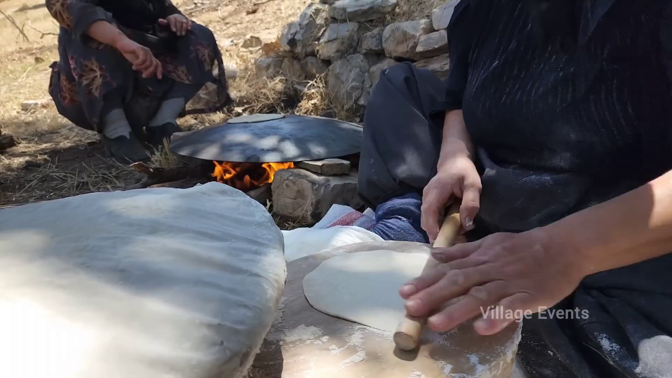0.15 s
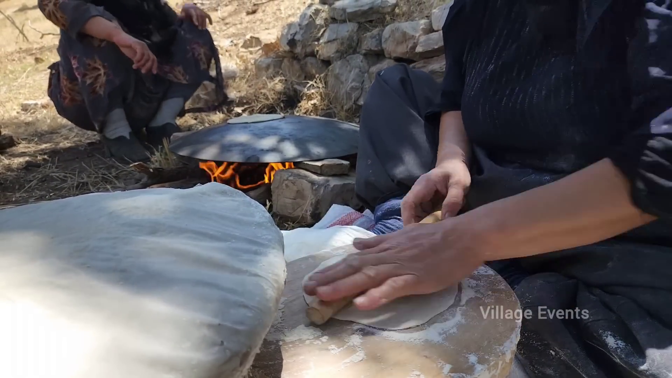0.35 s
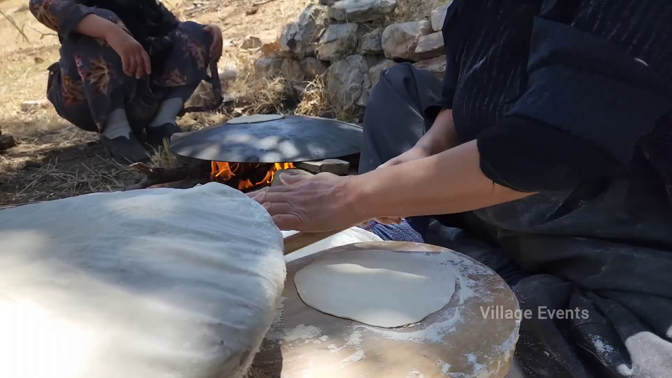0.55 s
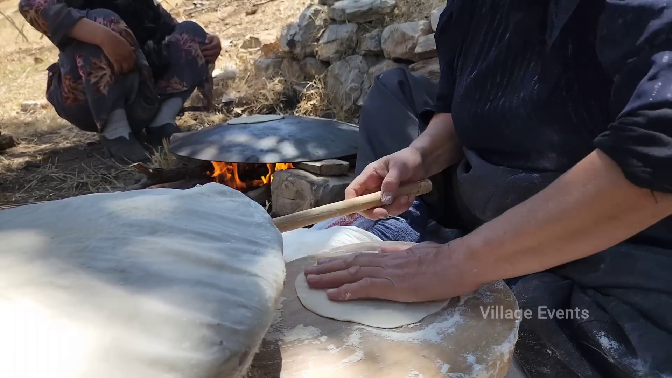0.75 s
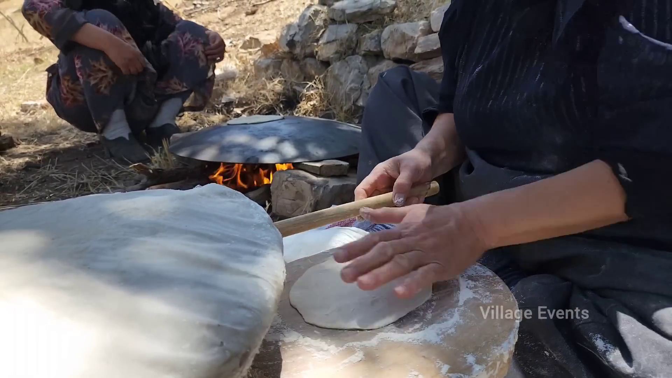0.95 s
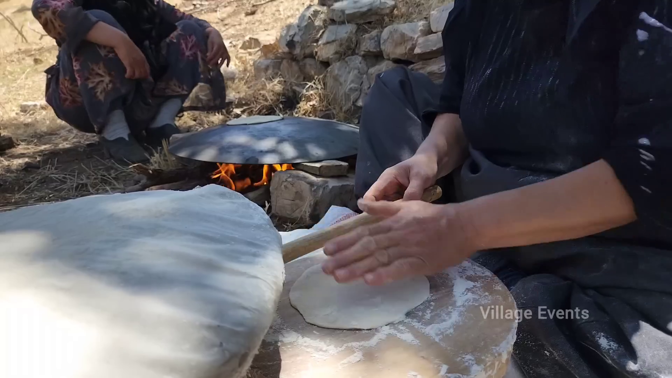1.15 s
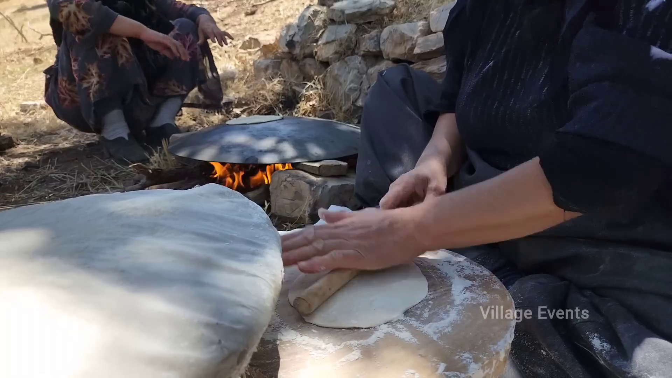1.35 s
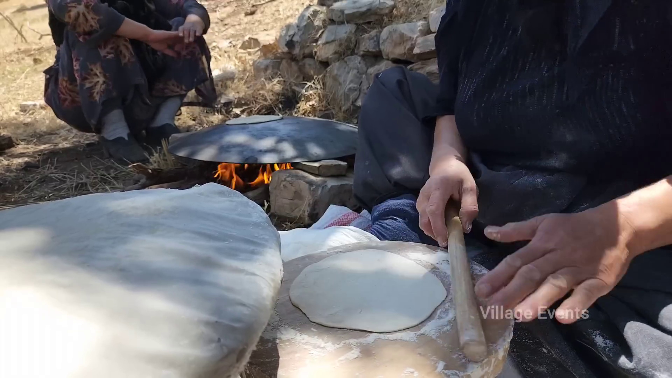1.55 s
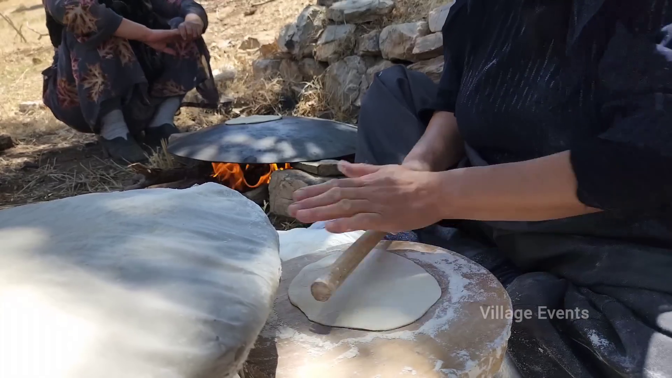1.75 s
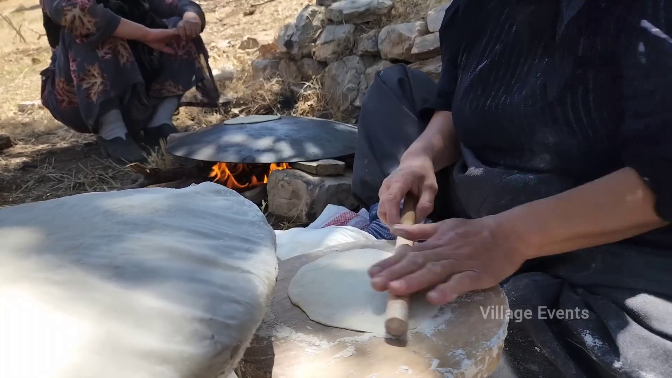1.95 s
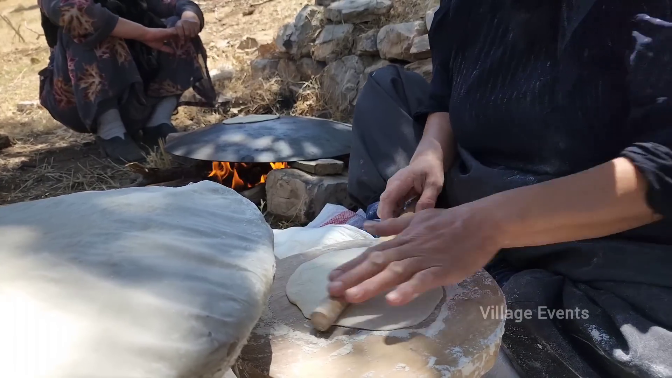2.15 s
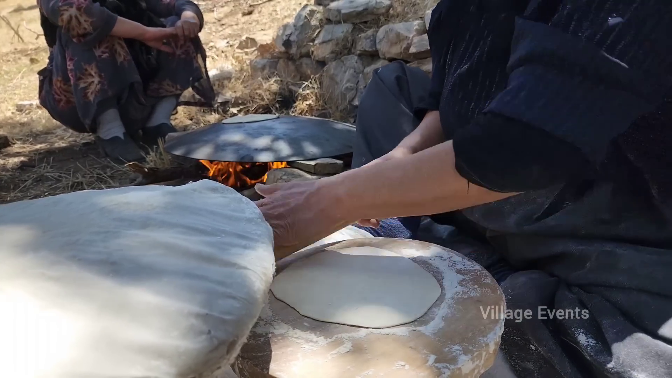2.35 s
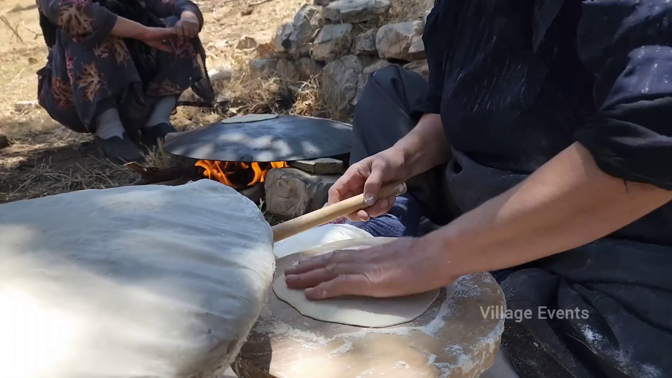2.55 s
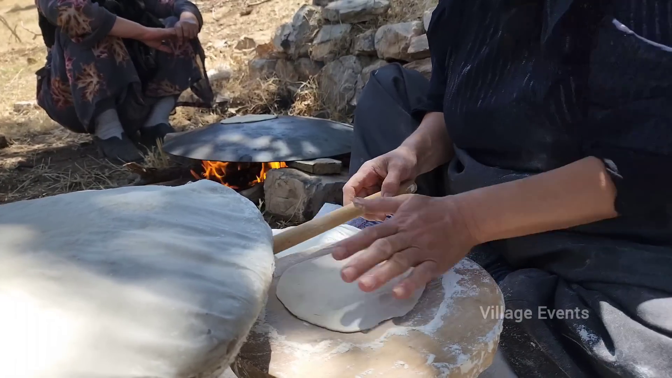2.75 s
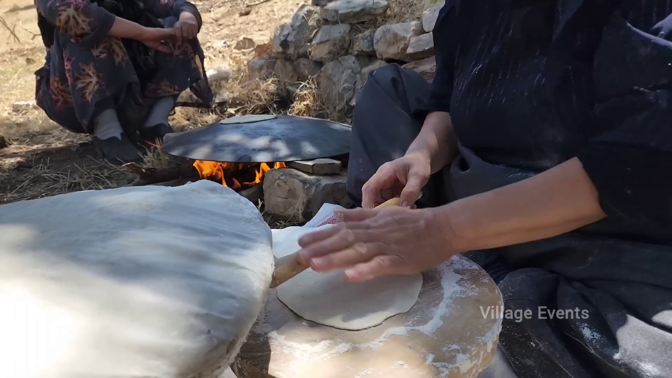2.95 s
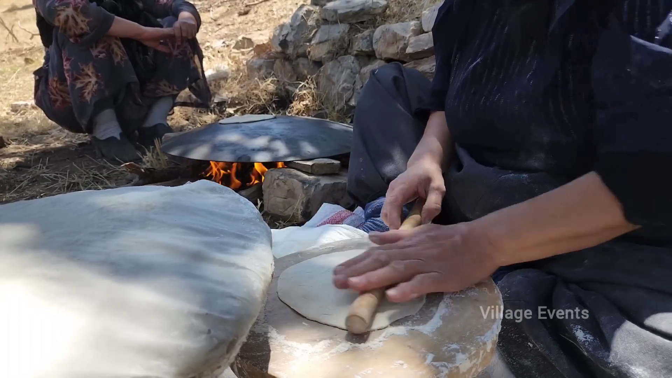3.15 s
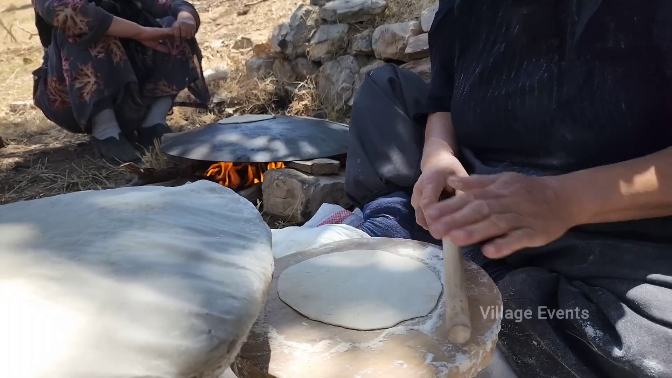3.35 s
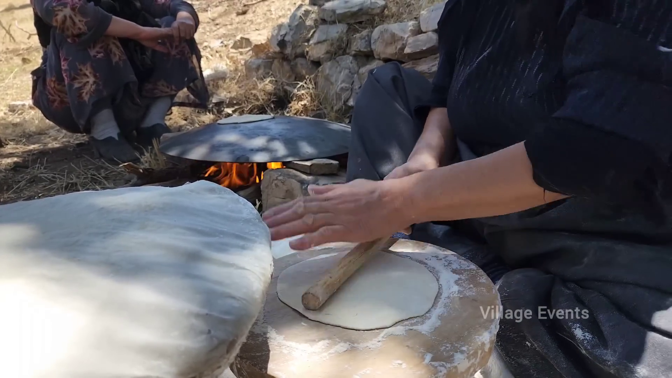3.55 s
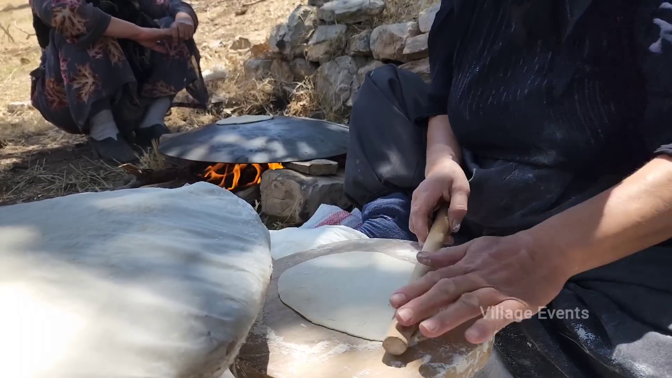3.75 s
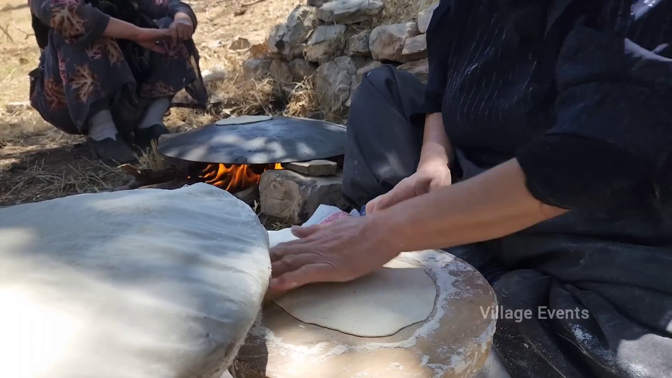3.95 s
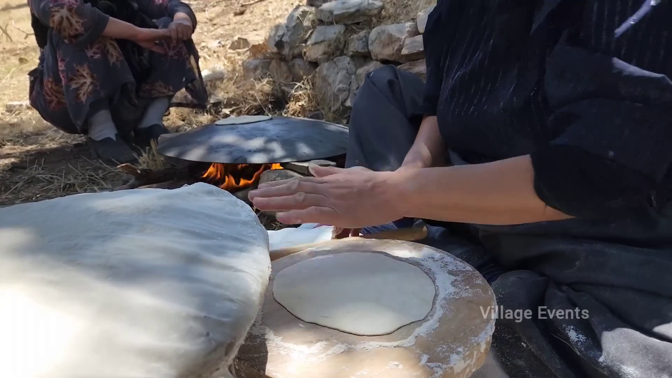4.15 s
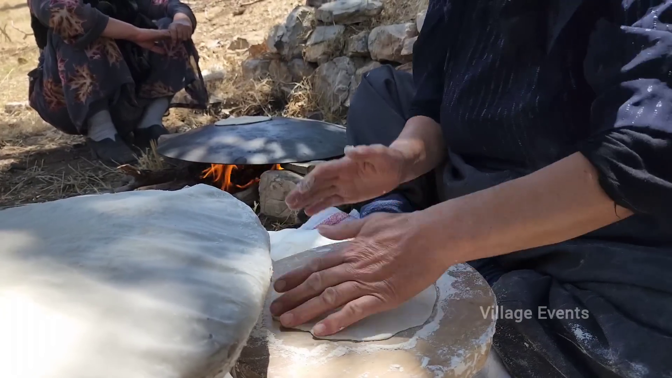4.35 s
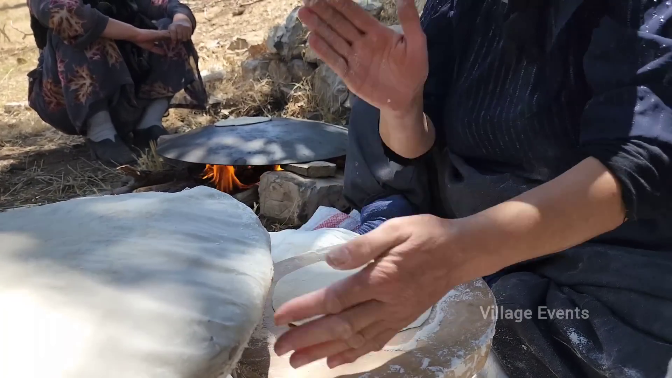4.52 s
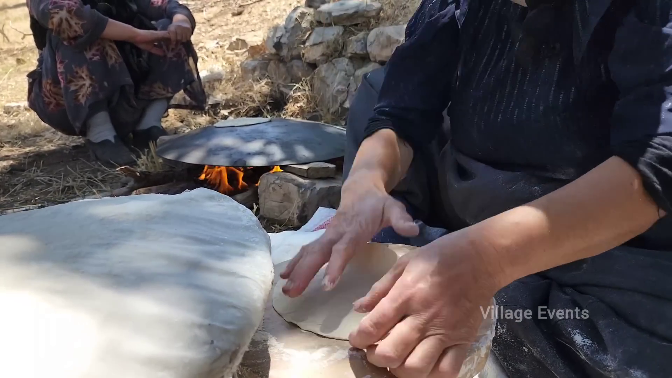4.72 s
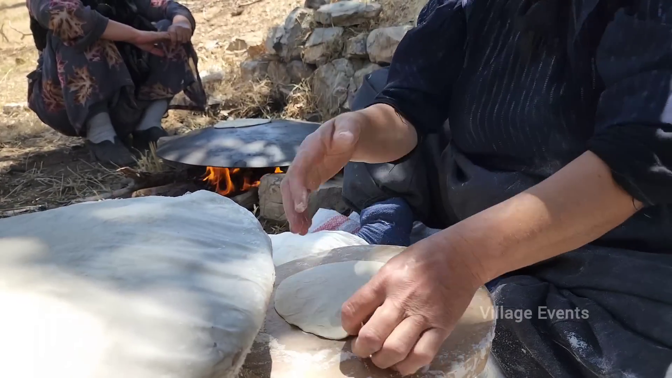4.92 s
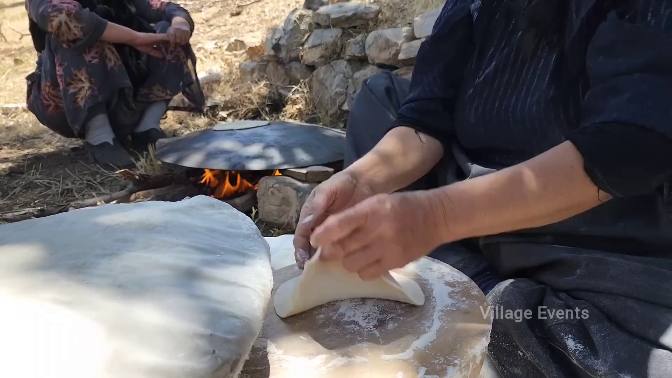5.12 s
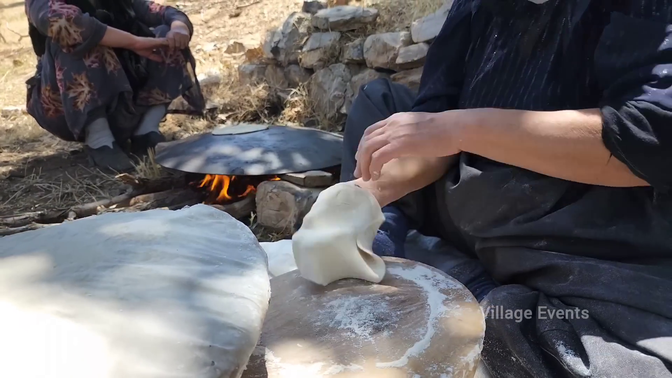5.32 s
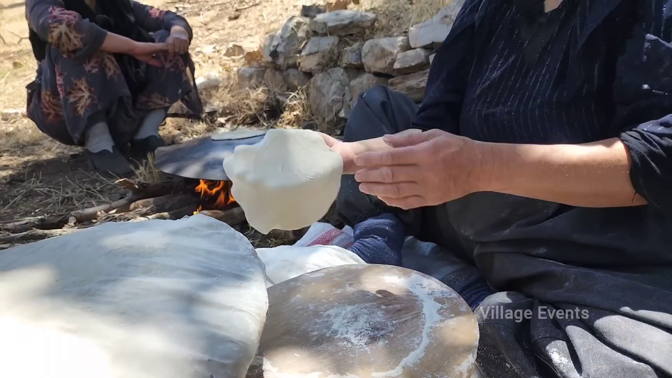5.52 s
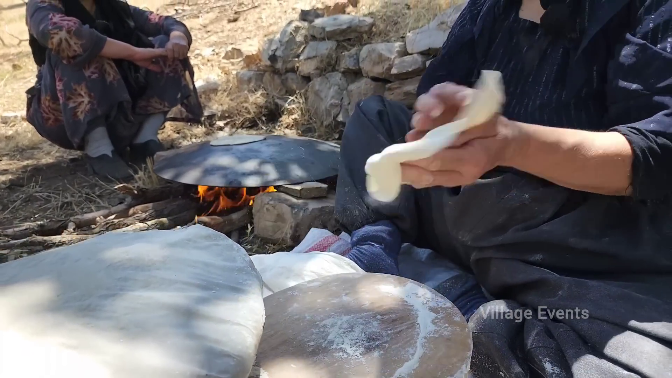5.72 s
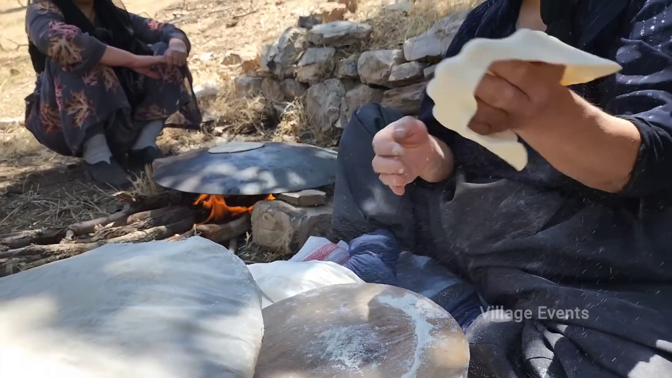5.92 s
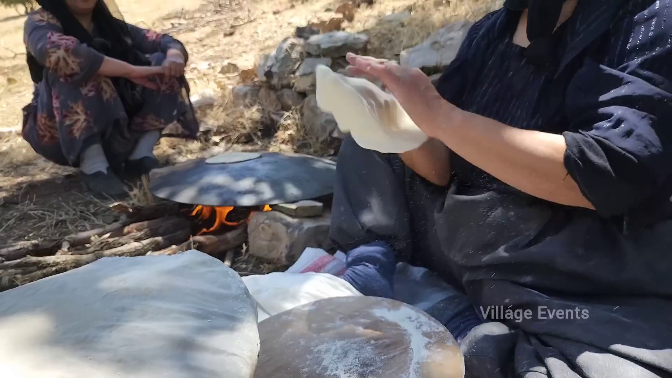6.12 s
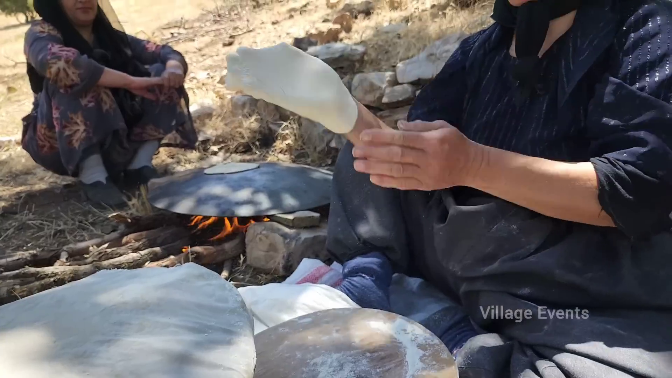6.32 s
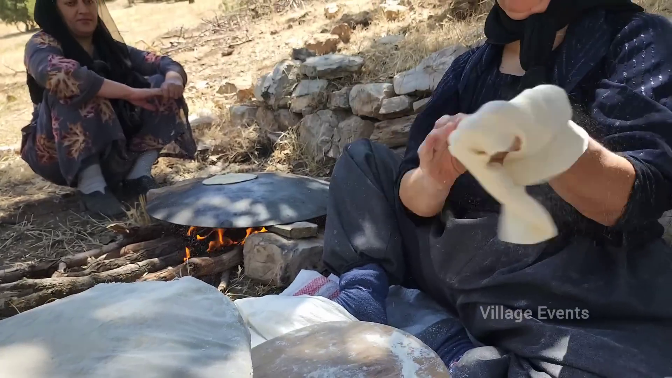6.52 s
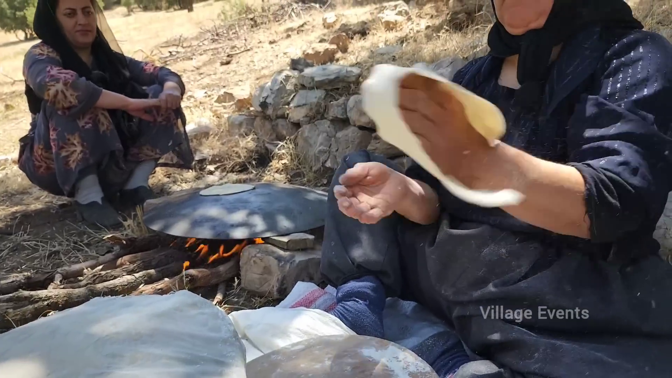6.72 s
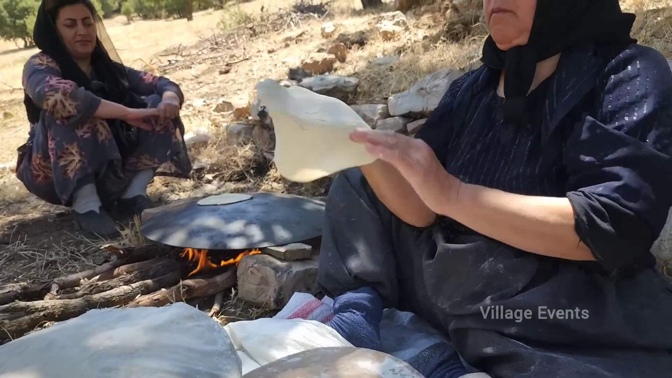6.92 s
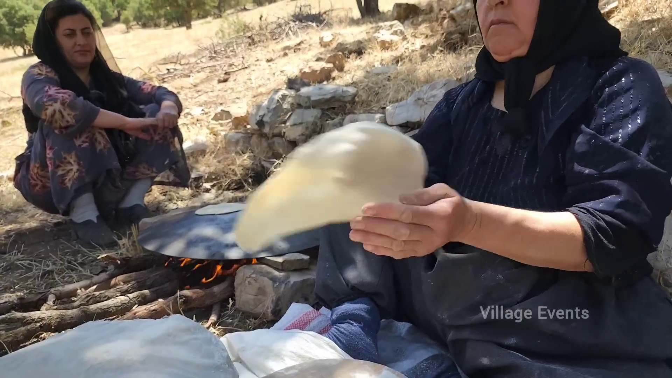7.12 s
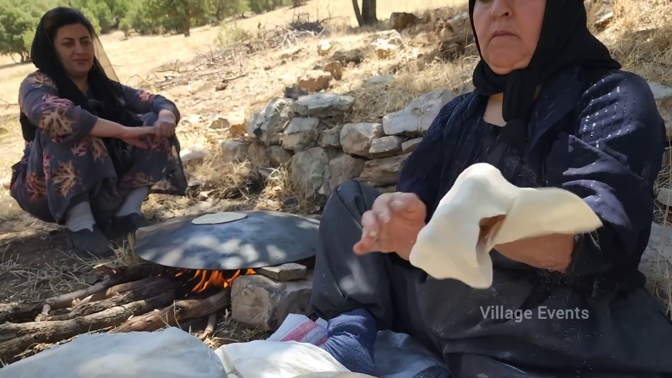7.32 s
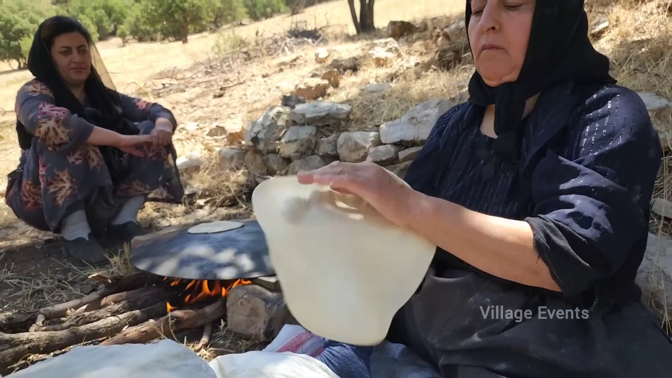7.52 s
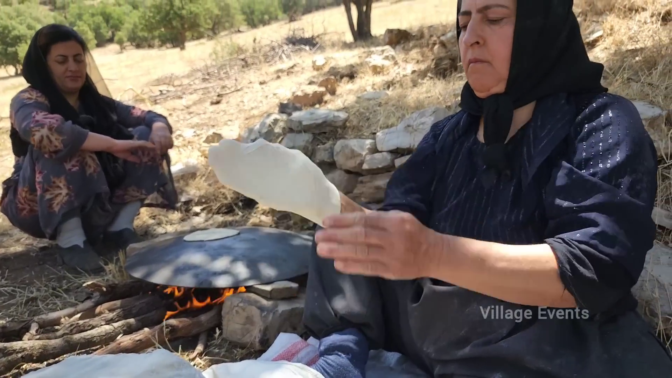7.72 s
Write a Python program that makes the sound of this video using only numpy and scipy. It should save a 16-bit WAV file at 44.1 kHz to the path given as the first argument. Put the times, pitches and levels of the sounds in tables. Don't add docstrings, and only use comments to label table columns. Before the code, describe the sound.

An arm's length from a round wooden board, light pin knocks, short rolling rattles and dry hand wipes come irregularly over quiet open air and faint far birds. The pin clatters down, a palm smacks the dough sharply, and after a pause of chirping, groups of soft popping slaps arrive roughly every third of a second while the bird trills and whistles, blurred by leaves.

```python
import sys
import numpy as np
from scipy import signal
from scipy.fft import rfft, irfft
from scipy.io import wavfile
from scipy.ndimage import uniform_filter1d

SR = 44100
rng = np.random.default_rng(int(sys.argv[2]) if len(sys.argv) > 2 else 0)


def magnitude_from_level(level_db):
    exponent = np.asarray(level_db, float) / 20
    return 10 ** exponent


def bounce(signal):
    frames = np.transpose(np.atleast_2d(signal))
    limited = np.clip(frames, -1, 1)
    pcm = np.round(limited * 32767).astype(np.int16)
    wavfile.write(sys.argv[1], SR, pcm)


N = 347047
T = np.arange(N) / SR


def filtered(x, points, power=1):
    hz, db = np.transpose(points)
    f = np.maximum(np.fft.rfftfreq(x.shape[-1], 1 / SR), 1)
    gain = magnitude_from_level(power * np.interp(np.log(f), np.log(hz), db))
    return irfft(rfft(x) * gain, x.shape[-1])


def thin(x, hz):
    return signal.sosfilt(signal.butter(2, hz, "high", fs=SR, output="sos"), x)


def unit(x):
    return x / np.sqrt(np.mean(x ** 2))


def peak(x, db):
    return x * magnitude_from_level(db) / np.max(np.abs(x))


def ring(x, hz, t60):
    pole = np.exp(2j * np.pi * hz / SR - np.log(1000) / (t60 * SR))
    return signal.lfilter([1], [1, -pole], x).imag


def walk(rate):
    k = int(SR / rate)
    held = np.repeat(rng.standard_normal(N // k + 1), k)
    return uniform_filter1d(uniform_filter1d(held, k), k)[:N]


def add(out, s, x, pan_db, lag_s=0.):
    for ch, sign in enumerate((1, -1)):
        i = max(int((s - sign * lag_s / 2) * SR), 0)
        out[ch, i:i + len(x)] += magnitude_from_level(sign * pan_db / 2) * x[:N - i]


def echoes(x, t60, db, start_s):
    t = T[:SR]
    cloud = rng.standard_normal((2, len(t))) * magnitude_from_level(-60 * t / t60) * np.clip(t / start_s, 0, 1)
    cloud *= magnitude_from_level(db) / np.sqrt(np.sum(cloud ** 2, axis=1, keepdims=True))
    return signal.fftconvolve(np.broadcast_to(x, (2, N)), cloud, axes=1)[:, :N]


# (frequency [Hz], level [dB per Hz])
AIR_COLOUR = [(12, -33.5), (24, -12), (36, -6.5), (79, -2), (125, -16.5), (252, -27), (600, -32),
              (1290, -33.5), (2910, -37), (4190, -34.5), (8010, -39.5), (10300, -34.5), (15300, -40),
              (16600, -57)]
# (time [s], level [dB])
FLAME = [(0.0, -60), (0.33, -60), (0.57, -59.5), (2.741, -60.5), (7.52, -59), (7.87, -56)]
# (frequency [Hz], likeness [0-1])
ALIKE = [(30, 0.96), (80, 0.96), (500, 0.052), (1500, 0.14), (4000, 0.18), (15000, 0.084)]


def air():
    mid, side = rng.standard_normal((2, N))
    mid = filtered(mid, [(hz, 10 * np.log10(1 + c)) for hz, c in ALIKE])
    side = filtered(side, [(hz, 10 * np.log10(1 - min(c, .99))) for hz, c in ALIKE])
    hush = filtered(np.array([mid + side, mid - side]), AIR_COLOUR)
    hush *= magnitude_from_level(-52) / np.sqrt(np.mean(np.mean(hush, axis=0) ** 2))
    low = filtered(hush, [(110, 4.5), (200, -28.5)])
    s, db = np.transpose(FLAME)
    swell = magnitude_from_level(np.interp(T, s, db) - np.mean(db) + 0.83 * walk(4.5))
    return (hush - low) * magnitude_from_level(0.51 * walk(4.8)) + low * swell


def glides(rows, settle):
    settle_share, sag_db_per_s, slur_ends_db = 0.4, -57.5, -2
    u = np.linspace(0, 1, num=12)
    for s, length, from_hz, to_hz, db in rows:
        if settle:
            path = 1 - np.exp(-u / settle_share)
            fade = sag_db_per_s * length * u
        else:
            path = (1 - np.cos(np.pi * u)) / 2
            fade = slur_ends_db * (2 * u - 1) ** 2
        hz = from_hz + (to_hz - from_hz) * path / path[-1]
        yield np.transpose([s + length * u, hz, db + fade])


def trill(start_s, spacing_s, db, count):
    return [(start_s + k * spacing_s, db) for k in range(count)]


def whistle(notes, wobble_hz=30):
    out, wobble = np.zeros(N), wobble_hz * walk(150)
    for note in notes:
        s, hz, db = np.transpose(note)
        i, j = int(s[0] * SR), int(s[-1] * SR)
        t = T[i:j]
        glide = uniform_filter1d(np.interp(t, s, hz), size=150) + wobble[i:j] * hz[0] / 7000
        ends = np.clip(np.minimum(t - s[0], s[-1] - t) / 0.00074, 0, 1)
        out[i:j] += ends * magnitude_from_level(np.interp(t, s, db)) * np.sin(2 * np.pi * np.cumsum(glide) / SR)
    return out


# (time [s], length [s], from [Hz], to [Hz], level [dB])
FAR = [(0.002, 0.0036, 5200, 8260, -42.5), (.01, 0.0057, 7350, 8860, -37.5),
       (.33, 0.033, 5760, 5310, -65.5), (1.17, 0.18, 8480, 7500, -65), (5.87, 0.13, 377, 342, -64),
       (1.865, 0.077, 8070, 6700, -59.5), (2.56, 0.061, 7980, 7200, -65), (3.52, 0.26, 7250, 7130, -68),
       (3.98, 0.036, 4580, 4300, -56), (4.96, 0.078, 4080, 4060, -66), (5.27, 0.067, 3990, 3950, -63.5),
       (5.48, 0.041, 1123, 1145, -65), (5.548, 0.031, 3870, 3830, -52), (5.585, 0.047, 3720, 3890, -49),
       (5.635, 0.14, 3910, 3920, -59), (5.08, 0.11, 3450, 3300, -72), (5.46, 0.074, 3300, 3180, -65),
       (6.03, 0.057, 8300, 7200, -63), (6.08, 0.067, 7160, 7450, -63), (.62, 0.094, 7330, 7660, -73),
       (1.18, .1, 7500, 7200, -70), (7.09, 0.032, 1150, 1113, -66), (5.955, 0.032, 2940, 2800, -61.5),
       (6.205, 0.038, 2460, 2880, -60.5), (7.03, 0.033, 2620, 3435, -60.5), (7.05, 0.02, 2420, 2860, -56.5),
       (7.23, 0.023, 2920, 2800, -52.5), (7.25, 0.047, 2710, 2282, -55.5), (7.31, 0.022, 2536, 2130, -55.5),
       (7.335, 0.026, 2590, 2210, -59.5), (7.51, 0.0097, 2690, 2270, -58)]
SLURS = [(4.325, 0.036, 5500, 4160, -52.5), (4.415, 0.077, 4400, 6650, -51),
         (4.54, 0.045, 5700, 4060, -49.5), (4.628, 0.067, 4410, 6600, -48.5),
         (5.685, 0.087, 5833, 6180, -44), (6.35, 0.048, 3730, 2955, -59), (6.572, 0.028, 5100, 3570, -49),
         (7.722, 0.051, 4340, 3600, -53.5)]
FLICKS = [(6.661, 0.012, 5620, 7240, -47), (6.81, 0.01, 6770, 5540, -55), (7.058, 0.01, 6650, 5540, -56),
          (7.304, .008, 6590, 5500, -54), (7.523, 0.0128, 7620, 6720, -47)]
SAGS = [(4.085, 0.2, 7910, 6760, -52), (6.675, 0.12, 7570, 6910, -44.5), (7.795, 0.036, 8400, 7570, -49)]
# (time after start [s], pitch [Hz], level [dB])
SLOW = [(0, 7080, -4.5), (.008, 7000, 2.5), (.018, 6844, -1.5), (.035, 6320, 0.5), (.045, 6560, 0.5),
        (.06, 7600, 0.5), (.066, 8005, -42.5), (.072, 5130, 7.5)]
FAST = [(0, 5050, 0), (.006, 5906, 2.5), (.014, 6600, -2.5), (.022, 6900, -13.5), (.034, 4500, -1)]
HOOK = [(0, 4610, -14.5), (.01, 5460, 3), (.02, 4450, 3), (.036, 3620, -2.5)]
ARCH = [(0, 5600, -4.5), (.013, 7400, 3.5), (.026, 7710, 3.5), (.048, 7830, -2.5), (.075, 7750, -4),
        (.095, 7430, -3), (.112, 7060, 1)]
SWOOP = [(0, 6740, -4), (.022, 6390, -2), (.042, 6084, 0.5), (.062, 5210, -1.5), (.075, 4800, -13)]
DIVE = [(0, 8200, -9.5), (.015, 6900, 0.5), (.04, 4800, 1), (.056, 4600, -9)]
# (time [s], level [dB])
SLOW_AT = [(4.762, -49), (4.896, -50), (5.029, -48.5), (5.158, -48), (5.293, -47.5), (5.427, -47)]
HOOK_AT = [(6.815, -50.5), (7.066, -50.5), (7.317, -50.5)]
ARCH_AT = [(6.91, -48.5), (7.163, -47)]
SWOOP_AT = [(7.535, -42), (7.703, -43)]
DIVE_AT = [(6.453, -43)]
# (time [s], level [dB])
CHORUS = [(4.8, -83.5), (5.1, -71), (5.6, -70), (6.1, -73), (7.001, -73), (7.5, -63), (7.87, -77)]


def birds():
    fast_at = trill(5.812, .0775, -47.5, count=7)
    repeats = ((SLOW, SLOW_AT), (FAST, fast_at), (HOOK, HOOK_AT),
               (ARCH, ARCH_AT), (SWOOP, SWOOP_AT), (DIVE, DIVE_AT))
    vary = .03
    song = []
    for shape, at in repeats:
        for s, db in at:
            stretch = 1 + vary * rng.standard_normal()
            detune = 1 + vary / 4 * rng.standard_normal()
            song.append(np.multiply(shape, (stretch, detune, 1)) + (s, 0, db))
    song += [*glides(SLURS + FLICKS, False), *glides(SAGS, True)]
    near = whistle(song) * magnitude_from_level(6.5 + 2.7 * walk(120))
    far = whistle(glides(FAR, False), wobble_hz=159) * magnitude_from_level(3 * walk(60))
    out = echoes(near, 0.65, 0.98, 0.025) + echoes(near, 0.1, -4.5, 0.003)
    out = out * magnitude_from_level(np.array([[2.], [-2.]])) + echoes(far, 0.28, 6.7, 0.00072)
    add(out, 0, filtered(near, [(4500, -10), (6300, -6), (7600, -1.5)]), 4.5, 8e-5)
    s, db = np.transpose(CHORUS)
    for hz in (3220, 3500, 4230):
        band = [(hz / 1.3, -30), (hz / 1.08, -3), (hz * 1.08, -3), (hz * 1.3, -30)]
        voice = unit(filtered(rng.standard_normal((2, N)), band))
        out += voice * magnitude_from_level(np.interp(T, s, db, left=-150) - 2 + 5 * walk(9))
    return out


# (frequency [Hz], level [dB], t60 [s])
BOARD = [(103.7, -6.5, 0.1), (144, 0.5, 0.11), (199.5, 0, 0.1), (285, 5.5, 0.044), (386.4, 12, 0.019),
         (535, 9.5, 0.039)]


def thud(t, contact_s, damping):
    push = np.gradient(t * np.exp(-t / contact_s))
    return sum(magnitude_from_level(db) * ring(push, hz, damping * t60) * 150 / hz for hz, db, t60 in BOARD)


# (frequency [Hz], level [dB], t60 [s])
PIN = [(814, -7.5, 0.16), (1967, -7, 0.17), (2079, -1.5, 0.075), (2800, -10, 0.1), (3582, -1, 0.056),
       (3794, -0.5, 0.046), (5274, -5, 0.072), (5676, -1.5, 0.064), (7500, 2.5, 0.03), (9830, -3.5, 0.03),
       (12100, -13, 0.013)]
# (time [s], peak level [dB], board level [dB], hardness [dB])
KNOCKS = [(0.041, -52, -20, -20), (1.105, -51, 1, -16), (0.402, -39.5, -30, -3), (0.529, -35.5, -24, -11),
          (0.547, -45.5, -35, -42), (0.565, -44, -34, -15), (1.42, -67, -27, -8), (1.935, -65.5, -16, 6),
          (2.148, -51.5, 1, -30), (2.217, -35.5, -3, 1), (2.359, -34.5, -39, -3), (3.149, -44, -2, 4),
          (3.664, -60, -10, 6), (3.943, -42, -1, -5.5), (3.97, -28.5, -31, -16), (4.063, -38, -34, -51),
          (4.085, -14.5, -53, -13), (4.1, -34, -30, -40), (4.121, -35.5, -9, -11.5), (4.276, -47, 8.5, -38),
          (4.3137, -40, -5, -30), (4.3184, -11.5, 2, -31)]
BOUNCE = [(4.331, -22, -5, -33)]
# (time [s], one per knock)
PLACED_S = (4.063, 4.085, 4.3185, 4.331)
# (level [dB], one per knock)
PLACED_WAKE = [(-13, -12, -8.5, 0), (-2, 1, -5.5, 11), (-14, 10.5, -4.5, 8), (-8, -13, -9, -4),
               (-5, 11, 1, -13), (-3, 6, -7, -3), (-3, -19, -3, -7), (-3, 17.5, -4, -10),
               (-6, -20, -16, -8), (-6, 6.5, -5, -4), (-6, -0.5, -4, -4)]
# (level [dB], one per knock)
PLACED_CLACK = (6, -11.5, -2.5, -4)
# (frequency [Hz], level [dB], t60 [s])
RIM = [(775, 1, 0.072), (980, 1.5, 0.024), (1620, 6.5, 0.025), (2000, -12, 0.1), (2800, 3.5, 0.03),
       (3740, -4.5, 0.051)]


def knocks():
    out, t = np.zeros((2, N)), T[:SR // 4]
    chance = rng.standard_normal((len(KNOCKS) + 1, len(PIN)))
    hit = np.exp(-t / 0.000092)
    placed = dict(zip(PLACED_S, zip(np.transpose(PLACED_WAKE), PLACED_CLACK)))
    for (s, db, board_db, hard_db), place in zip(KNOCKS + BOUNCE, chance):
        wake_db, clack_db = 8.9 * place, -6
        for at, known in placed.items():
            if abs(at - s) < 4 / 1000:
                wake_db, clack_db = known
                break
        pin = np.zeros(len(t))
        for (hz, mode_db, t60), c, w in zip(PIN, place, wake_db):
            tilt_db = (hard_db + 22.5) * np.log2(hz / 1500) * 0.42
            pin += magnitude_from_level(mode_db + w + tilt_db) * ring(hit, hz * (1 + 0.0037 * c), 0.83 * t60)
        jolt = rng.standard_normal(len(t)) * np.exp(-t / 0.002)
        clack = ring(jolt, 525, 0.0081) + 0.16 * ring(jolt, 936, 0.033)
        clack += 0.3 * ring(jolt, 1580, 0.021) + .5 * ring(jolt, 2450, 0.0077)
        wood = thin(peak(pin, db) + peak(clack, db + clack_db), 300)
        add(out, s, wood + peak(jolt, db + hard_db - 4.0), 3.6, 7e-5)
        add(out, s + 0.00091, -peak(thud(t, 0.0004, 0.88), db + board_db), 2.5)
    rim_s, rim_db = 3.348, -24
    crack = rng.standard_normal(len(t)) * np.exp(-t / 0.0051)
    rim = sum(magnitude_from_level(db) * ring(hit, hz, min(t60, .055)) for hz, db, t60 in RIM)
    add(out, rim_s, peak(rim, rim_db) + peak(crack, rim_db - 14), 3.2, 5e-5)
    return out


ROLL_EDGE, WIPE_EDGE = .04, .1


def stroke(s, length, change_db, edge_share):
    nearest_end = np.minimum(T - s, (s + 1.166 * length - T) / 3.8)
    edge = np.clip(nearest_end / (0.0021 + edge_share * length), 0, 1)
    return edge, edge * magnitude_from_level(change_db * np.clip((T - s) / length - .5, -.5, .5))


# (time [s], length [s], flour hiss level [dB], pressure change [dB], pin rattle level [dB])
ROLLS = [(0.05, 0.052, -57, 1, -48), (0.1, 0.16, -64.5, -24, -58.5), (0.396, 0.037, -55, 3, -45),
         (0.432, 0.033, -67, 0, -53), (0.457, 0.036, -66, 0, -45), (0.491, 0.034, -56, 4, -52),
         (0.524, 0.05, -57, -1, -42.5), (1.397, 0.038, -48.5, 11.5, -45.5), (1.44, 0.14, -53, -11, -55.5),
         (1.924, 0.03, -51, 0, -51), (1.941, 0.15, -57, 1, -59), (2.215, 0.053, -61, -21, -60),
         (2.278, 0.093, -66, 16, -52.5), (2.357, 0.047, -76, -12, -46.5), (2.93, 0.023, -75, 0, -59),
         (3.062, 0.03, -70, -8, -60), (3.149, 0.2, -61.5, -10, -60.5), (3.328, 0.017, -75, 0, -61),
         (3.647, 0.038, -46, 6, -45.5), (3.683, 0.13, -64, -1, -60.5), (3.938, 0.017, -53, -3.5, -57),
         (3.952, 0.13, -83, -13, -58.5), (4.121, .035, -67, 0, -50.5), (4.165, 0.027, -76, 10, -65)]
# (time [s],
# length [s], flour hiss level [dB], pressure change [dB], scrape level [dB])
WIPES = [(0.804, 0.18, -62.5, -7, -53.5), (1.095, 0.029, -41.5, -19.5, -60), (1.108, 0.061, -42, 12, -58.5),
         (2.619, 0.17, -56.5, 3.5, -53.5), (2.896, 0.067, -50, -9, -72), (3.059, 0.022, -54.5, -5, -72),
         (4.27, 0.029, -52, 2, -63), (4.318, 0.015, -41.5, -3.5, -41), (4.333, 0.026, -50, -5, -56),
         (4.081, 0.011, -38, -6, -53), (4.12, .02, -57, -6.5, -77), (4.713, 0.0052, -33, -0.5, -76),
         (4.339, .23, -73, -4, -59), (4.499, 0.039, -61, 12.5, -58.5), (5.283, 0.14, -93, 12, -64)]
# (frequency [Hz], level [dB per Hz])
RUB = [(240, -7), (450, -16.5), (789, -43.5), (865, -10), (1710, -1.5), (3470, -9.5), (11900, -2.5),
       (16000, -11)]
PALM = [(700, -30.5), (1000, -12.5), (1300, -0.5), (2000, -1.5), (2700, -3.5), (4000, -6.5), (7000, -9.5),
        (15000, -23)]


def strokes():
    level, fine, pin, palm = np.zeros((4, N))
    for s, length, hiss_db, change_db, pin_db in ROLLS:
        edge, pressure = stroke(s, length, change_db, ROLL_EDGE)
        fine += pressure * magnitude_from_level(hiss_db)
        level += edge * magnitude_from_level(-60 + 0.26 * (pin_db + 54.5))
        pin += pressure * magnitude_from_level(pin_db)
    for s, length, hiss_db, change_db, scrape_db in WIPES:
        edge, pressure = stroke(s, length, change_db, WIPE_EDGE)
        fine += pressure * magnitude_from_level(hiss_db)
        palm += np.sqrt(edge * pressure) * magnitude_from_level(scrape_db)
    grains = rng.standard_normal((3, N)) * magnitude_from_level(0.78 * rng.exponential(size=(3, N)))
    grit = grains[0] + 0.55 * grains[1:]
    spray = grains[0] + 3.3 * grains[1:]
    skin = palm * magnitude_from_level(1.6 * walk(70)) * unit(filtered(grit, PALM))
    tone = [(60, -30), (200, -7), (2600, -2), (4000, 0.5), (10000, -11.5)]
    scrape = unit(filtered(filtered(grit, RUB), tone))
    hiss = unit(filtered(spray, [(5000, -11.0), (9500, -2.0), (12000, 3.0), (15500, -2.5)]))
    hops = magnitude_from_level(6 * walk(160) + walk(35))
    shaken = np.zeros(N)
    for hz, db, t60 in PIN[1:8]:
        clatter = unit(hops * magnitude_from_level(3.9 * walk(29.95)) * rng.standard_normal(N))
        mode = ring(pin * clatter, hz, .6 * min(t60, .06))
        shaken += magnitude_from_level(db - 2.7 * np.log2(hz / 2000)) * mode / np.sqrt(t60)
    out = level * magnitude_from_level(2.2 * walk(60)) * scrape + skin + fine * magnitude_from_level(1.4 * walk(55)) * hiss
    out = out * magnitude_from_level(np.array([[.3], [-.3]]))
    add(out, 0, magnitude_from_level(-35.5) * shaken, 1.5, 5e-5)
    return out


def pressing(rows, edge_share):
    return sum(stroke(s, length, change_db, edge_share)[1] * magnitude_from_level(db) for s, length, db, change_db in rows)


# (time [s], length [s], level [dB], change [dB])
BARE = [(0.527, 0.048, -56.5, -4), (1.46, 0.058, -70, -2), (2.362, 0.037, -55, -4)]
SING = [(1.387, 0.19, -64, -3), (2.9, 0.057, -74, 0), (3.15, 0.17, -68, -3), (3.653, 0.26, -66.5, -5),
        (4.178, .035, -62, 0)]
SHUFFLES = [(4.352, 0.25, -59, -7), (5.9, 0.25, -67, 0), (7.39, .15, -65.5, -5), (7.623, 0.27, -66, 3.5)]
# (frequency [Hz], level [dB], t60 [s])
BARE_MODES = [(990, -2.5, 0.025), (1390, -7.5, 0.028), (2800, -2.5, 0.037)]


def bare():
    out, grit = np.zeros((2, N)), rng.standard_normal((3, N))
    board = sum(magnitude_from_level(db) * unit(ring(grit[0], hz, t60)) for hz, db, t60 in BARE_MODES)
    add(out, 0, board * pressing(BARE, ROLL_EDGE) * magnitude_from_level(1.9 * walk(90)), 2.5, 5e-5)
    singing = sum(unit(ring(grit[1] * magnitude_from_level(5 * walk(60)), hz, .012)) for hz, db, t60 in PIN[6:8])
    add(out, 0, singing * pressing(SING, ROLL_EDGE), 1.5, 5e-5)
    dull = [(120, -20), (250, 1.5), (500, -4.5), (900, -6.5), (1600, -20)]
    cloth = unit(filtered(grit[0] + 0.73 * grit[1:], dull))
    return out + pressing(SHUFFLES, WIPE_EDGE) * magnitude_from_level(5.5 * walk(45)) * cloth


# (time [s], peak level [dB], board level [dB])
SMACK_AT = [(4.718, 1, -12.5)]
# (frequency [Hz], level [dB], t60 [s])
CUP = [(600, -13.5, 0.017), (760, -19, 0.0036), (932, -10, 0.017), (1150, -19, 0.007), (1390, -5, 0.0072),
       (1710, -16, 0.0051), (2090, -14, 0.0098), (2820, -1.5, .009), (3580, -3.5, .009),
       (4110, -9.5, 0.0085), (5200, -7, .006), (6100, -13.5, 0.0018), (7200, -8.5, .004),
       (9050, -9, 0.0016), (11300, -17.5, 0.0018)]
BOOM = [(168, -3, 0.03), (261, -10.5, 0.028), (342, -16.5, 0.035), (483, -18.5, 0.027), (583, -21, 0.013)]


def smack():
    out, t = np.zeros((2, N)), T[:SR // 4]
    for s, db, board_db in SMACK_AT:
        burst = ring(rng.standard_normal(len(t)), 8000, 0.00051) * t ** 2 * np.exp(-t / 0.0015)
        fingers = 0.18 * np.exp(-((t - .0006) / .00006) ** 2)
        land = fingers + np.exp(-((t - .0021) / .00004) ** 2)
        cup = np.zeros(len(t))
        for k, (hz, mode_db, t60) in enumerate(CUP):
            swell = ring(ring(land, hz, t60), hz, .4 * t60)
            cup += (-1) ** k * magnitude_from_level(mode_db) * peak(swell, 0)
        tail = ring(rng.standard_normal(len(t)), 3300.5, 2.2 / 1499)
        tail = tail * np.exp(-t / .011) * np.clip(t / 0.0034, 0, 1)
        crack = peak(peak(cup, 0) + peak(burst, -9.5), db)
        add(out, s, crack + peak(tail, db - 23), 4.5, 7e-5)
        push = np.gradient(t * np.exp(-t / 0.00032))
        boom = sum(magnitude_from_level(d) * peak(ring(ring(push, hz, t60), hz, t60), 0) for hz, d, t60 in BOOM)
        add(out, s + 0.0025, -peak(boom, db + board_db), 2.8)
    return out


# (time [s], peak level [dB], pop pitch [Hz], thud level [dB], brightness [dB])
SLAPS = [(5.78, -33, 1700, -12, -1), (5.829, -38, 853, -28, -10.5), (6.139, -39, 1110, -9, -15.5),
         (6.149, -32.5, 1230, -16, -15), (6.154, -28, 1726, -30, -2), (6.161, -15.5, 1020, -12, -9.5),
         (6.184, -55, 750, -18, -15), (6.19, -51, 2620, 4.5, 4), (6.495, -39, 560, -20, -7.5),
         (6.503, -33, 1530, -12, 16), (6.521, -27, 1790, -39, -4), (6.534, -36.5, 1420, -20, -5),
         (6.56, -41, 2130, -20, -11), (6.585, -39.5, 2020, -15, -0.5), (6.845, -50, 1040, -11, 12.5),
         (6.862, -26, 1970, -30, -2.5), (6.869, -16, 1080, -24, -8.5), (6.9, -52.5, 1000, 4, 23.5),
         (7.088, -46.5, 1230, -8, -5.5), (7.208, -40, 1530, -15, -4), (7.222, -36.5, 675, -8, -7),
         (7.212, -30.5, 1850, -18, -1), (7.236, -27.5, 1612, -12, 0), (7.275, -37.5, 2420, -34, -18),
         (7.313, -46.5, 2254, 0.5, -8), (7.577, -21.5, 1116, -11.5, -5), (7.595, -15.5, 1470, -14, -14),
         (7.628, -56, 950, -24, -10), (7.639, -43, 930, -30, -9)]


def slaps():
    out, t = np.zeros((2, N)), T[:SR // 4]
    lead_s = .01
    late = np.maximum(t - lead_s, 0)
    for s, db, hz, thud_db, bright_db in SLAPS:
        crack_db = -46 + 0.4 * (db + 28.0) + 0.58 * bright_db
        ragged = np.repeat(rng.standard_normal(len(t) // 64 + 1), 64)[:len(t)]
        flap = 4e-5 * np.exp(-np.abs(t - lead_s) / 0.017) * magnitude_from_level(5.8 * ragged)
        squeeze = rng.standard_normal(len(t)) * (late * np.exp(-late / 0.0014) + flap)
        pop = ring(squeeze, hz, 9 / hz)
        crackle = filtered(squeeze, [(150, -7.0), (400, -22.5), (1300, 6.5), (2200, bright_db + 16.5),
                                     (4200, bright_db + 3.5), (7000, bright_db - 13.0)])
        crack = filtered(squeeze, [(4000, -47.0), (7500, -6), (11000, 1.0), (16000, -8)])
        slap = peak(pop, db - 3.5) + peak(crackle, db - 0.5) + peak(crack, crack_db)
        add(out, s - lead_s, thin(slap, 200)[:len(t) // 2], 4.4, 8e-5)
        add(out, s, peak(thud(t, 0.00063, 0.55), db + thud_db), 2.6)
    return out


def stones(near):
    colour = [(200, -10.5), (1000, -15.0), (2200, -10.0), (3400, -6.0), (5500, 2.0), (10000, -5.5)]
    return echoes(filtered(np.mean(near, axis=0), colour), 0.13, -7.5, 0.0043)


def scene():
    near = strokes() + knocks() + slaps() + smack() + bare()
    return near + stones(near) + birds() + air()


def top_cut(x):
    return signal.sosfilt(signal.butter(12, 15850, fs=SR, output="sos"), x)


def record(dry):
    top = signal.ellip(8, .2, 50, 15850, fs=SR, output="sos")
    cut = signal.sosfilt(top, thin(dry, 20))
    return top_cut(np.clip(cut, -1, 1))


dry = scene()
out = record(dry)
bounce(out)
```